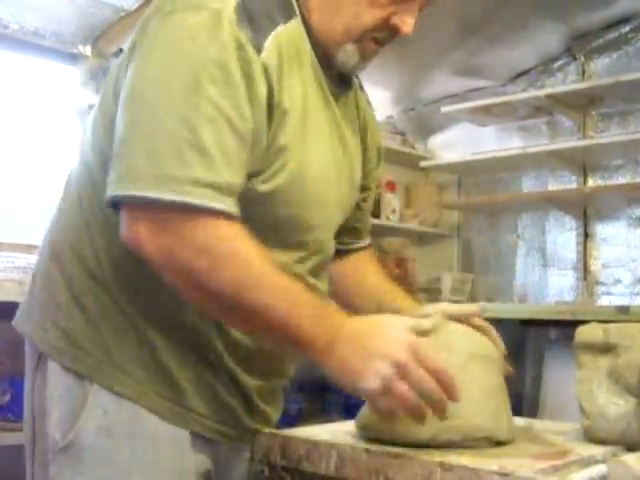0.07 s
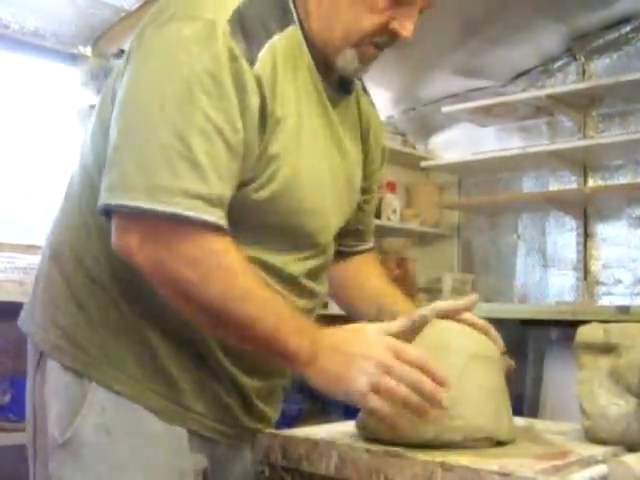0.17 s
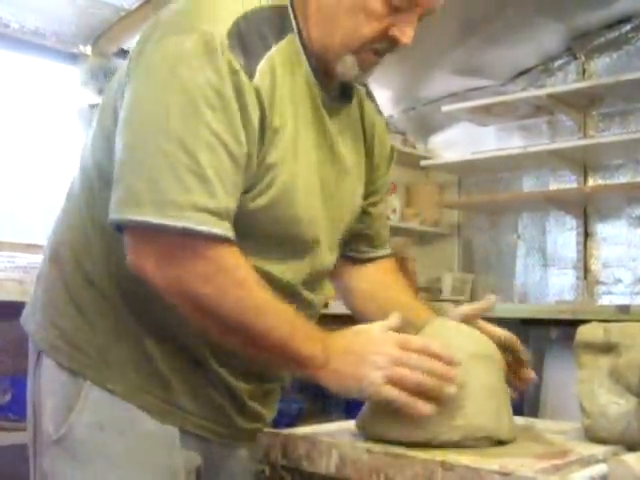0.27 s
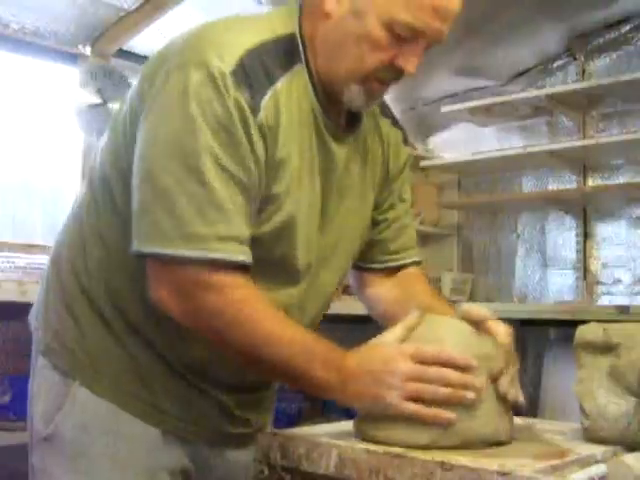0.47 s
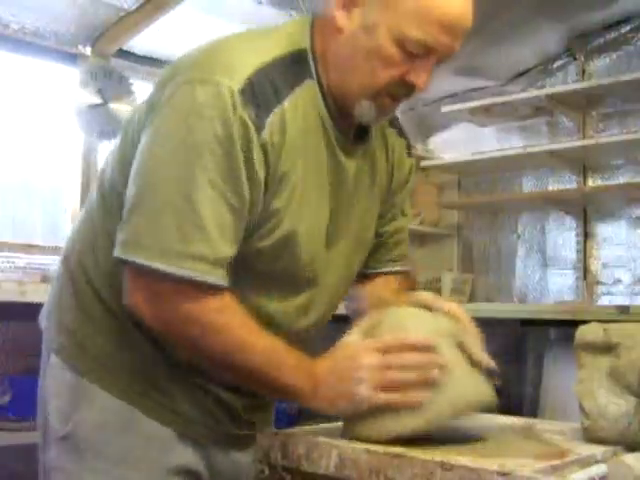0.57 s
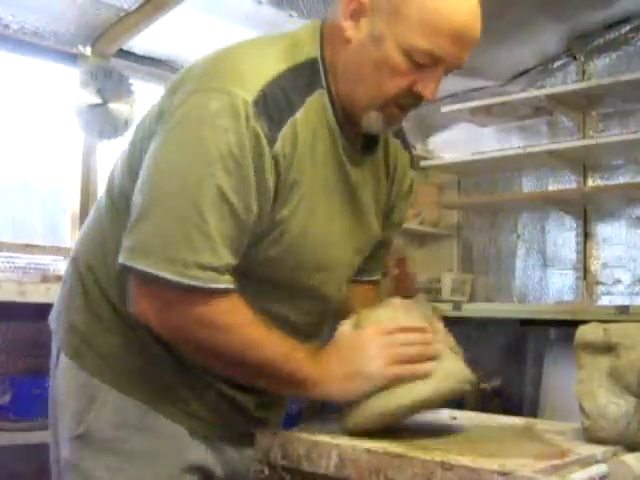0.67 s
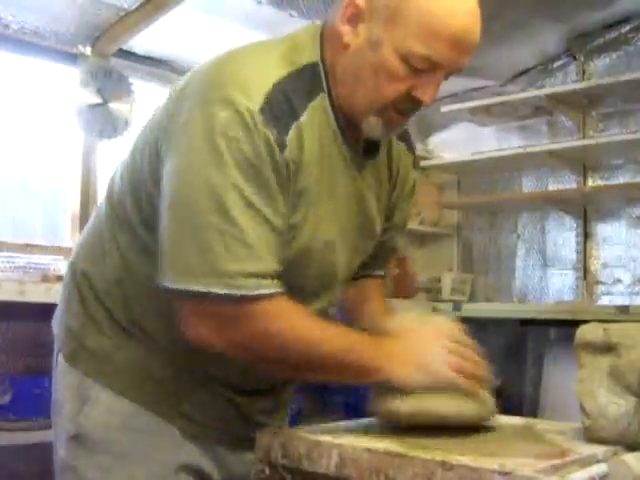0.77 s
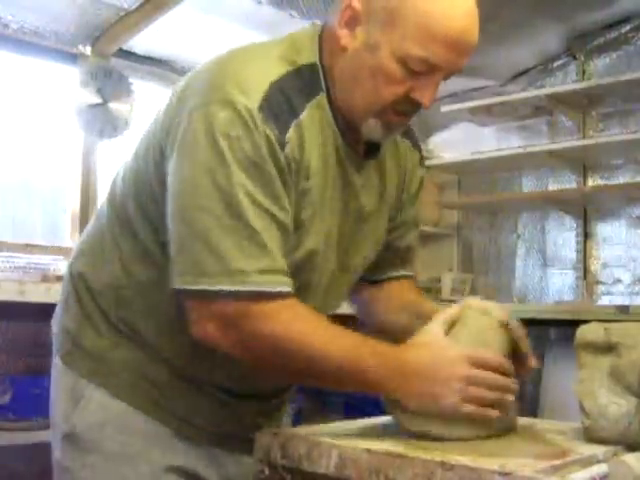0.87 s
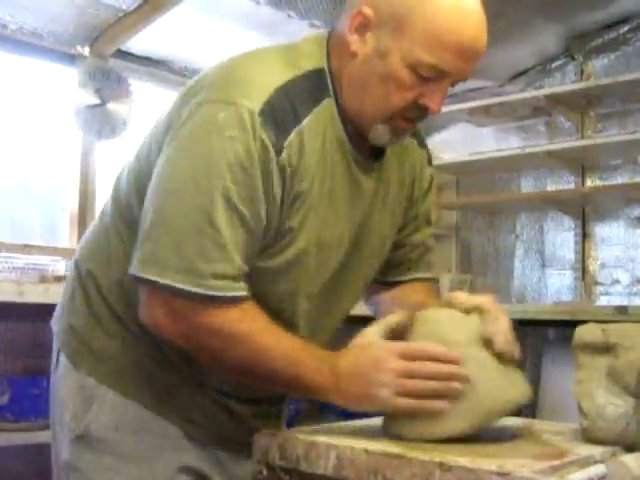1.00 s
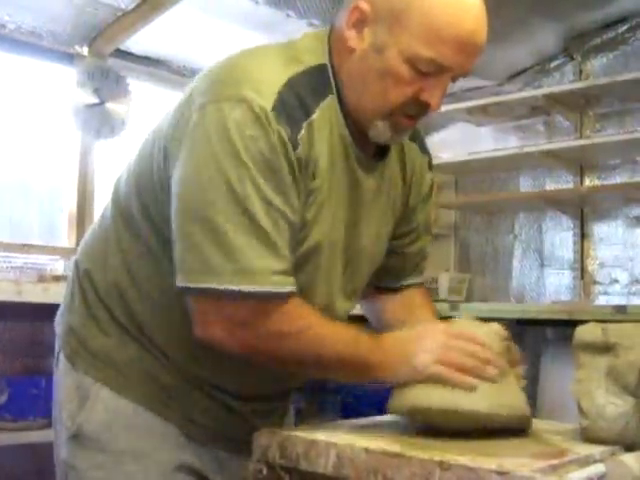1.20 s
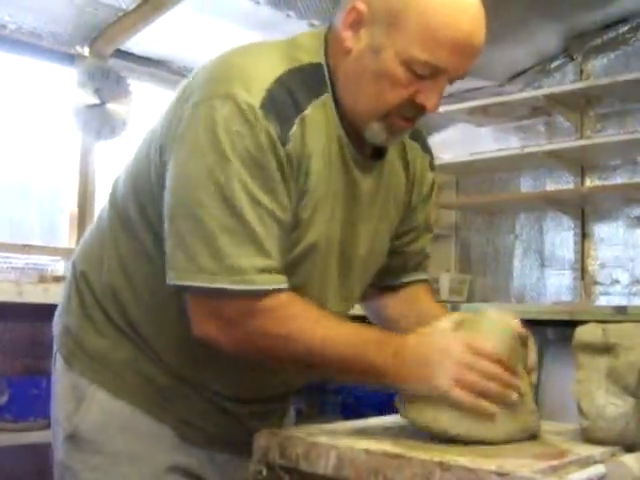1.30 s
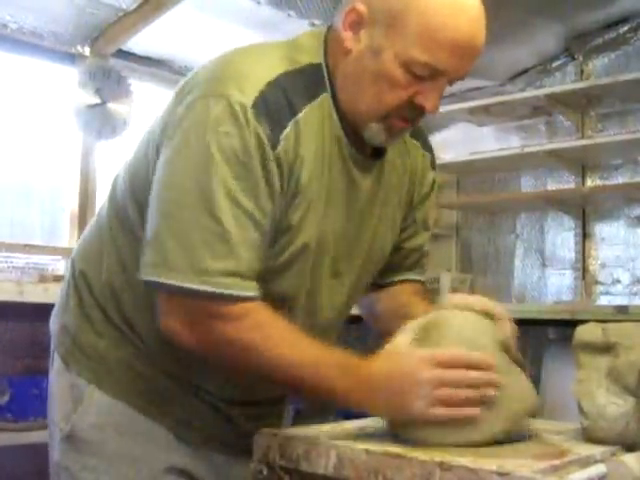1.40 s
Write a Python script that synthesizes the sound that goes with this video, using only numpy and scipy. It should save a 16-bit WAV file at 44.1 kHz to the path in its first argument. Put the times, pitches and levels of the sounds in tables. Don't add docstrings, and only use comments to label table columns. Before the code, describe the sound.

After a brief hand scuff, wet clay lands with a booming thump and slapping crackle; light pats fade, then a loose board knocks as the clay is rocked. Close, slightly dull microphone, short room tail, low hum.

```python
import sys
import numpy as np
from scipy import signal
from scipy.fft import rfft, irfft
from scipy.io import wavfile
from scipy.ndimage import uniform_filter1d

SR = 44100
rng = np.random.default_rng(int(sys.argv[2]) if len(sys.argv) > 2 else 0)


def output_pcm(signal):
    pcm = np.clip(np.atleast_2d(signal).T, -1, 1) * 32767
    wavfile.write(sys.argv[1], SR, np.round(pcm).astype(np.int16))


def gain_from_db(level_db):
    decades = np.asarray(level_db, float) / 20
    return 10 ** decades


N = 63945


def evened(x):
    return x / np.sqrt(np.mean(x ** 2) + 1e-20)


def read(points, hz):
    f, value = np.transpose(points)
    return np.interp(np.log(hz + 1), np.log(f + 1), value)


def add(mix, start_s, sound):
    part = mix[max(round(start_s * SR), 0):][:len(sound)]
    part += sound[:len(part)]


def colour(x, points):
    gain = gain_from_db(read(points, np.fft.rfftfreq(len(x), 1 / SR)))
    return irfft(rfft(x) * gain, len(x))


def ring(pitch_hz, t60_s, rise_s):
    t = np.arange(0, min(t60_s, 0.5), 1 / SR)
    return np.sin(2 * np.pi * pitch_hz * t) * gain_from_db(-60 * t / t60_s) * (1 - np.exp(-t / rise_s))


def grains(per_s, spread_db):
    clicks = (rng.random(N) < per_s / SR) * rng.choice([-1., 1.], N)
    return clicks * gain_from_db(spread_db * np.minimum(rng.exponential(1, N), 4))


# freq_hz [Hz], density_db [dB per Hz]
ROOM_SPECTRUM = [(12, -36.5), (20, 4), (73, -3.5), (319, -20), (501, -25), (765, -23.5), (1390, -27),
                 (1980, -32), (7800, -38.5), (10100, -70), (17200, -120)]
ROOM_LEVEL_DB = -44
# freq_hz [Hz], level_db [dB]
MAINS_HUM = [(100, -58), (400, -66.5), (500, -64.5), (600, -73)]


def room_tone():
    t = np.arange(N) / SR
    hum = sum(gain_from_db(level_db + 4) * np.sin(2 * np.pi * (hz * t + rng.random())) for hz, level_db in MAINS_HUM)
    hiss = evened(colour(rng.standard_normal(N), ROOM_SPECTRUM[:-2]))
    return gain_from_db(ROOM_LEVEL_DB) * hiss + hum


# start_s [s], length_s [s], level_db [dB]
STROKES = [
    (0.0084, 0.15, -51.5),
    (0.65, 0.04, -61),
    (1.307, 0.078, -49.5),
    (0.11, .05, -41),
    (.262, 0.047, -43.5),
]
# freq_hz [Hz], density_db [dB per Hz]
FRICTION_SPECTRUM = [(530, -43), (900, -19), (1380, 0.5), (3910, -13.5), (4690, -16), (6800, -20),
                     (8800, -33.5), (11400, -81), (19400, -120)]


def scuffs():
    t = np.arange(N) / SR
    stroke = np.zeros(N)
    for start_s, length_s, level_db in STROKES:
        stroke += gain_from_db(level_db) * np.sin(np.pi * np.clip((t - start_s) / length_s, 0, 1))
    drive = grains(per_s=6800, spread_db=1.0)
    return stroke * evened(colour(drive, [(400, -53.5)] + list(FRICTION_SPECTRUM)))


# time_s [s], level_db [dB]
SHAKE_LEVEL = [(0, -45.5), (0.118, -45.5), (0.124, -24), (.16, -23), (.185, -27.5), (.2, -22.5),
               (.225, -32), (.29, -32.5), (0.321, -42), (.49, -47), (.62, -51), (0.891, -56.5), (0.91, -40),
               (1.05, -44.5), (1.1, -46.5), (1.311, -57), (1.345, -42), (1.45, -41.5)]
# freq_hz [Hz], density_db [dB per Hz]
CONTACT_SPECTRUM = [(71, -41.5), (120, -7.5), (351, -11.5), (594, -8.5), (648, -17), (938, -14.5),
                    (1240, -24), (1400, -24), (8000, -53), (10400, -88.5), (17600, -120)]
# freq_hz [Hz], width_hz [Hz], level_db [dB]
BENCH_MODES = [(142.6, 16, 6.5), (183.9, 26, 0), (271, 45, -11.5), (302.7, 120, -1.5), (448, 38, 1),
               (520, 75, -10.5), (575, 8.3, -16.5), (723, 50, -8), (894, 27, -22.5), (925, 11, -29),
               (1410, 31, -9)]


def shudder():
    drive = grains(per_s=2500, spread_db=2.2)
    body = np.zeros(N)
    for hz, width_hz, level_db in BENCH_MODES:
        mode = ring(hz, 7.0 / max(width_hz, 8), 0.000061)
        body += gain_from_db(level_db) * signal.oaconvolve(drive, width_hz * mode)[:N]
    contacts = evened(colour(drive, [(50, -39.0)] + list(CONTACT_SPECTRUM)))
    ring_db = -5
    sound = evened(contacts + gain_from_db(ring_db) * evened(body))
    time_s, level_db = np.transpose(SHAKE_LEVEL)
    return gain_from_db(np.interp(np.arange(N) / SR, time_s, level_db)) * sound


# start_s [s], crackle_db [dB], bright_share [0-1], pop_db [dB], pop_hz [Hz]
SLAP_EVENTS = [(.0265, -50, 0.1, -38.5, 933), (.120, -36, 0.03, -32, 990), (0.1291, -31, 0.15, -28.5, 2220),
               (.137, -32.5, .1, -31.5, 1300), (.1925, -40.5, 0.05, -30.5, 560),
               (0.2002, -35, 0.34, -33.5, 1640), (0.213, -46, 0, -36, 1500), (0.2711, -30, 0.8, -47, 3040),
               (0.2769, -31.5, 0.64, -35, 538), (.282, -40.5, 0.6, -45, 1910),
               (0.291, -37, 0.36, -41.5, 1550), (0.311, -42.5, 0.4, -38, 1330),
               (0.4416, -47.5, 0.38, -61, 1590), (.350, -48, 0.3, -33.5, 602), (.347, -56, 0, -45.5, 683),
               (.384, -67, 0.2, -46, 590), (.399, -71, 0.4, -35, 520), (0.458, -68, 0.26, -41.5, 464),
               (.462, -71, .2, -39, 630), (.470, -69, 0.3, -38.5, 450), (0.5139, -42.5, 0.36, -59, 1870),
               (.5187, -38, 0.37, -41, 456), (0.534, -43.5, 0.07, -58, 1000),
               (0.5748, -48, 0.2, -43.5, 510), (.907, -44, 0.46, -42.5, 1400),
               (0.913, -48, 0.5, -37.5, 990), (.924, -51.5, 0.5, -47, 990), (1.323, -63, 0.5, -56, 1300),
               (1.338, -57, 0.4, -46.5, 1550), (1.352, -51, 0.5, -53, 2050), (1.36, -44, 0.75, -55, 3000),
               (1.0425, -59, 0.3, -41, 447), (1.059, -45, 0, -38, 1530), (1.0607, -37.5, 0.57, -28, 523),
               (1.207, -47.5, 0.27, -58.5, 1634), (1.2088, -55, 0, -57, 2900), (1.2091, -48, 0.5, -33, 456),
               (1.153, -45, 0, -52.5, 1490), (1.4351, -35.5, 0.52, -65, 1460)]
# freq_hz [Hz], density_db [dB per Hz]
BRIGHT_SPECTRUM = [(900, -14.5), (1500, -11.5), (3000, -12), (4700, -2), (6500, -4), (8000, -11),
                   (8800, -8)]
# freq_hz [Hz], density_db [dB per Hz]
DULL_SPECTRUM = [(1000, 1), (1600, 0.5), (2100, -3.5), (2600, -11), (3100, -8), (3800, -15.5), (4400, -22),
                 (8000, -38)]


def crackle(drive, spectrum):
    x = colour(drive, [(400, -36)] + list(spectrum))
    return x / np.sqrt(uniform_filter1d(x ** 2, size=200) + 1e-12)


def swell(t, rise_s, fall_s):
    return np.where(t < 0, np.exp(t / rise_s), np.exp(-t / fall_s))


def slaps():
    out = np.zeros(N)
    drive = grains(per_s=9700, spread_db=3.5)
    bright, dull = crackle(drive, BRIGHT_SPECTRUM), crackle(drive, DULL_SPECTRUM)
    lead = 441
    t = np.arange(-lead, 1300) / SR
    quick = swell(t, rise_s=0.0005, fall_s=0.0018)
    slow = swell(t, rise_s=0.002, fall_s=0.0061)
    pop_lag_s, pop_turns, pop_swell_turns = 0.00028, 5.9, 0.5
    for start_s, crackle_db, share, pop_db, pop_hz in SLAP_EVENTS:
        at = round(start_s * SR) - lead
        share = np.clip(share, 0, 1)
        n = min(len(t), N - at)
        hiss = share * quick[:n] * bright[at:at + n]
        thud = (1 - share) * slow[:n] * dull[at:at + n]
        add(out, at / SR, gain_from_db(crackle_db) * (hiss + thud))
        pop = ring(pop_hz, 0.012 + pop_turns / pop_hz, 0.0007 + pop_swell_turns / pop_hz)
        add(out, start_s + pop_lag_s, gain_from_db(pop_db + 12.0) * pop)
    return out


# start_s [s], peak_db [dB], strike_db [dB against the ring]
BOARD_KNOCKS = [
    (0.974, -29.5, 6),
    (1.003, -24.5, 4),
    (1.021, -43.5, 6),
    (1.03, -43, -2),
    (1.153, -31, 4.5),
    (1.37, -26, 2.5),
    (1.403, -31, 5.5),
]
# freq_hz [Hz], level_db [dB], t60_s [s]
BOARD_MODES = [(404.5, -6, 0.095), (618, 1.5, 0.043), (734, -7, 0.047), (1166, -11, 0.02)]


def knocks():
    out = np.zeros(N)
    strike_hz, strike_s, strike_peak_s = 700, 0.0012, 0.002
    ring_lag_s, ring_rise_s = 0.0027, 0.0016
    t = np.arange(0, 2 * strike_peak_s + 0.0021, 1 / SR) - strike_peak_s
    strike = -np.cos(2 * np.pi * strike_hz * t) * np.exp(-0.5 * (t / strike_s) ** 2)
    for start_s, peak_db, strike_db in BOARD_KNOCKS:
        add(out, start_s, gain_from_db(peak_db + strike_db) * strike)
        for hz, mode_db, t60_s in BOARD_MODES:
            add(out, start_s + ring_lag_s, gain_from_db(peak_db + mode_db) * ring(hz, t60_s, ring_rise_s))
    return out


# start_s [s], peak_db [dB], pitch_hz [Hz], t60_s [s]
BENCH_BLOWS = [(0.12, -11.5, 111, 0.05), (0.1266, -5.5, 94.3, 0.071), (0.15, -8, 160, 0.023),
               (0.1625, -17.5, 100, 0.035), (.174, -19, 70, .05), (.1925, -8.5, 108, .025),
               (0.2027, -22.5, 83, 0.041), (.152, -27.5, 22, .2), (.258, -23, 27, 0.1),
               (0.325, -29, 18.5, 1), (.334, -26.5, 50, .05), (0.0019, -44, 373, 0.29),
               (.001, -45, 1860, 0.089), (.001, -48.5, 1500, .15), (0.04, -53.5, 1820, .2),
               (.083, -52.5, 1860, .15), (.02, -40.5, 350, 0.071), (1.058, -39, 2100, 0.032),
               (1.059, -42.5, 3100, .02), (1.059, -41, 3870, .02), (1.208, -39, 1670, .035),
               (1.209, -42.5, 3780, 0.028), (.439, -46.5, 3300, 0.013), (.12, -27, 1100, .03),
               (.201, -34, 2700, 0.014), (0.539, -37.5, 75, 0.22), (.804, -35.5, 100, .05),
               (0.886, -39.5, 100, 0.11), (0.9242, -26.5, 120, 0.04), (1.004, -34, 99, 0.056),
               (1.061, -30, 32, 0.28), (1.249, -32.5, 60, 0.063), (1.312, -31.5, 23, 0.33),
               (1.3809, -32, 110, 0.059), (0.14, -21, 304, 0.058), (.222, -28.5, 290, 0.039),
               (.258, -23.5, 240, 0.09), (.24, -29.5, 430, 0.062), (.279, -28, 410, 0.052),
               (.284, -27.5, 580, 0.068), (.305, -35, 340, 0.057), (.519, -34, 425, 0.055),
               (0.329, -33, 300, 0.12), (0.351, -31.5, 300, 0.088), (0.914, -30.5, 308, 0.027),
               (1.161, -31.5, 215, 0.07), (1.342, -33, 240, 0.083)]
# start_s [s], peak_db [dB], pitch_hz [Hz], t60_s [s]
BENCH_LIFTS = [(0.12, -14, 110, 0.026), (0.188, -15, 110, 0.019), (.1675, -10.5, 95, 0.028),
               (.55, -38, 65, .1), (.645, -32, 100, 0.083), (.226, -22, 45, 0.1), (0.22, -29.5, 61, .05),
               (1.16, -37, 62, 0.15), (0.581, -32, 52, 0.35), (0.61, -40, 58, 0.22), (0.83, -39.5, 60, .08),
               (.978, -21, 56.4, .09), (0.99, -40, 88, 0.072), (1.376, -33.5, 100, 0.053),
               (1.395, -31, 60, .06)]


def blows():
    out = np.zeros(N)
    rise_turns = 0.15
    for direction, table in ((-1.05, BENCH_BLOWS), (1, BENCH_LIFTS)):
        for start_s, peak_db, pitch_hz, t60_s in table:
            add(out, start_s, direction * gain_from_db(peak_db) * ring(pitch_hz, t60_s, rise_turns / pitch_hz))
    return out


# freq_hz [Hz], t60_s [s]
WALL_DECAY = [(100, 0.29), (1000, 0.13), (6000, 0.21)]
WALL_LEVEL_DB = -13.5


def walls(x):
    taps = np.zeros(SR // 2)
    at = np.arange(200, len(taps) - 20, 20)
    taps[at + rng.integers(0, 20, len(at))] = rng.choice([-1., 1.], len(at))
    hz, t, z = signal.stft(taps, SR, nperseg=256)
    decay = gain_from_db(-60 * t / read(WALL_DECAY, hz)[:, None])
    tail = signal.istft(z * decay, SR, nperseg=256)[1]
    return signal.fftconvolve(x, tail / np.linalg.norm(tail))[:N]


def scene():
    background = room_tone() + scuffs() + shudder()
    hits = slaps() + knocks() + blows()
    return (background + hits + gain_from_db(WALL_LEVEL_DB) * walls(hits))[None]


def band_limit(x):
    return signal.sosfilt(signal.butter(12, 8950, fs=SR, output="sos"), x)


# freq_hz [Hz], gain_db [dB]
MICROPHONE_RESPONSE = [(6, -9), (16, -0.5), (4300, -1.5), (4750, -6.5), (5100, 0.5), (7400, 1.5),
                       (8200, -6.5), (8800, -21.5), (9100, -53)]


def record(dry):
    heard = colour(dry[0], MICROPHONE_RESPONSE)[None]
    return band_limit(heard)


dry = scene()
out = record(dry)
output_pcm(out)
```